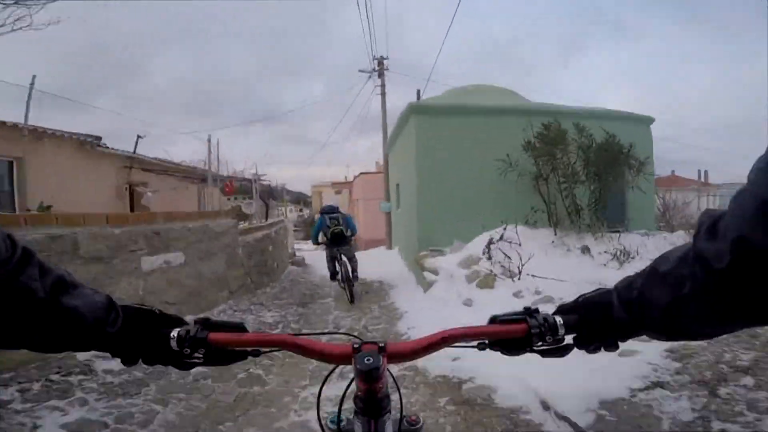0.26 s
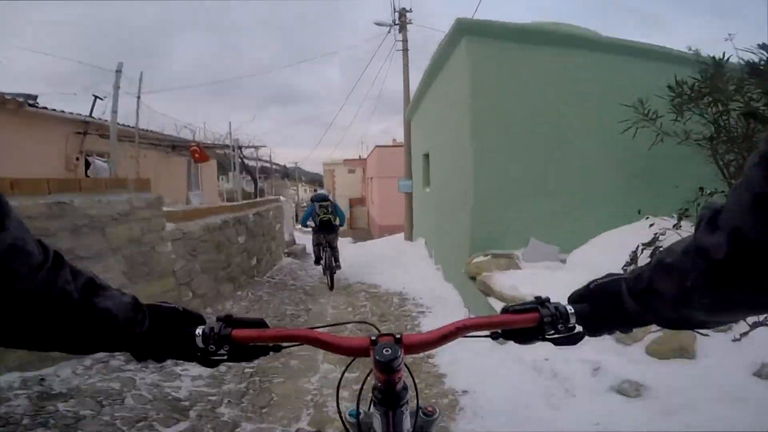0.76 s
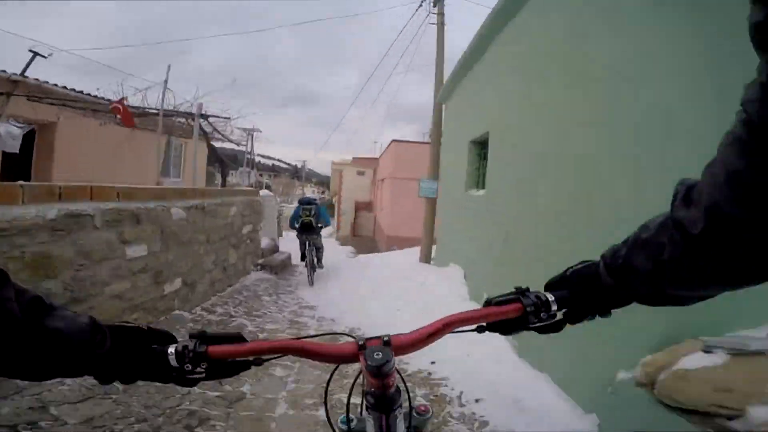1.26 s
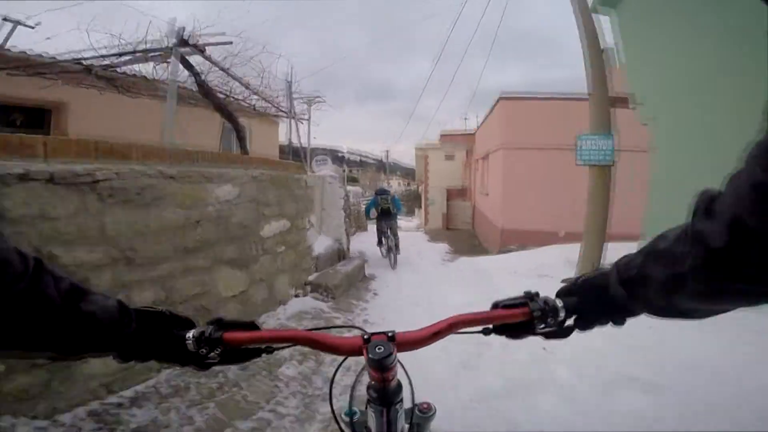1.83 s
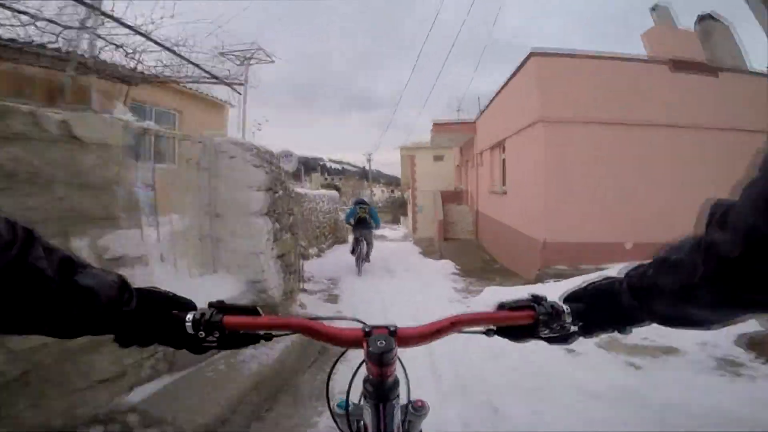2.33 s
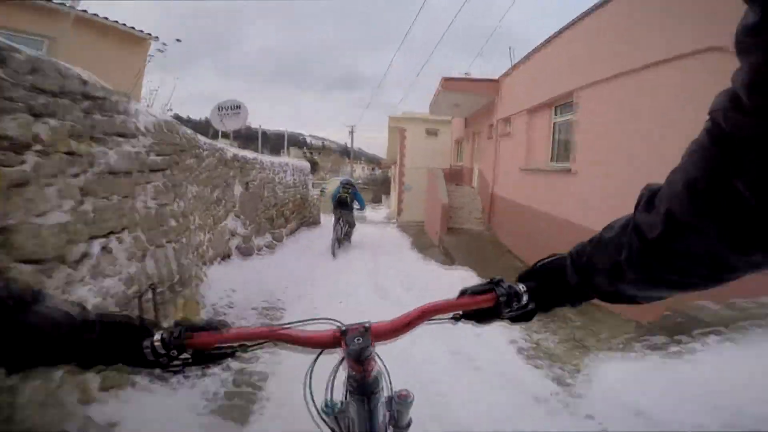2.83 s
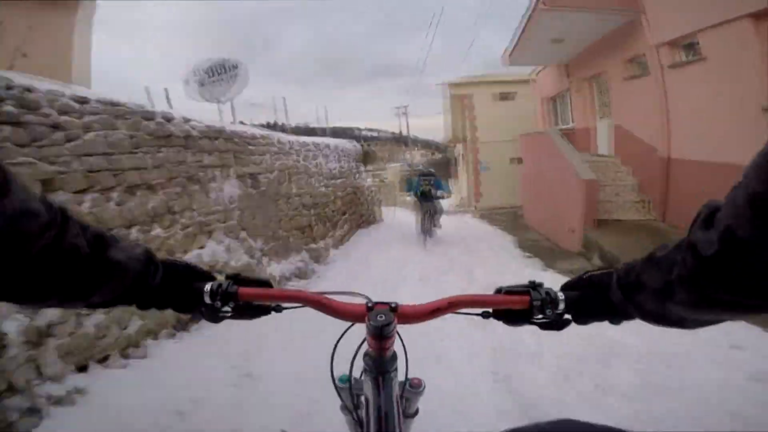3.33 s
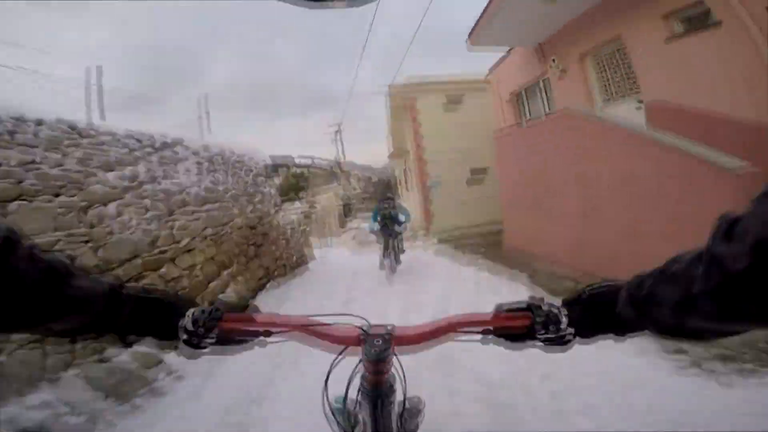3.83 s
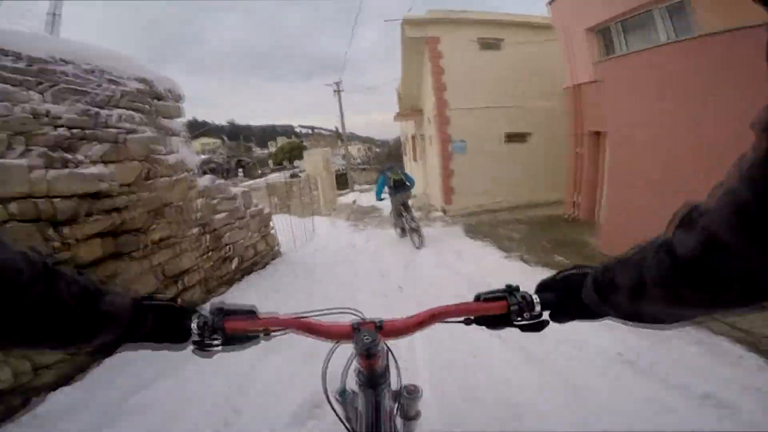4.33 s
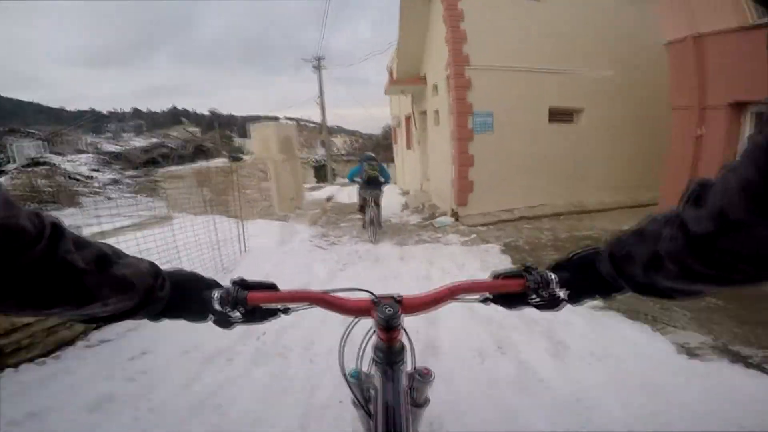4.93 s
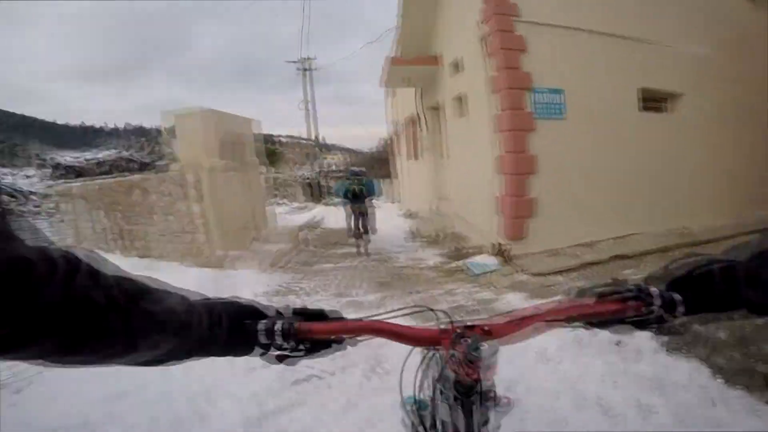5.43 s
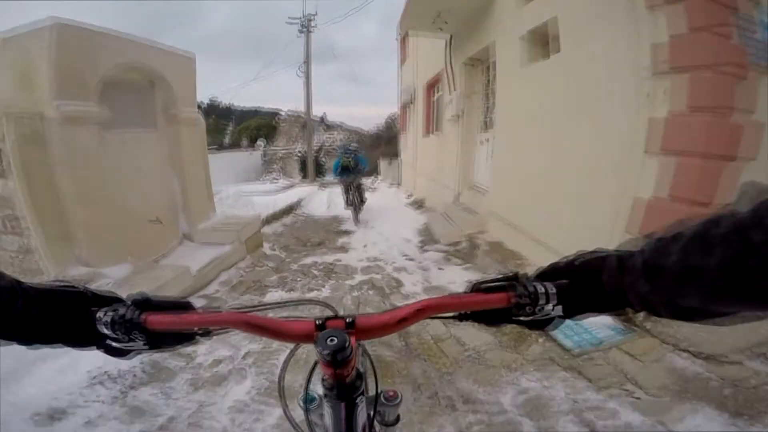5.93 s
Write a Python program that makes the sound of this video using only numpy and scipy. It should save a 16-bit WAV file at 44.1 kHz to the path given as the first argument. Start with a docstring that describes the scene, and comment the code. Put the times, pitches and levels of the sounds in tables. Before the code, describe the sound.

Close up, a hard plastic case clacks irregularly, several times a second, over constant fine rattling and crunching ice. Below, deep pressure swings and a droning road shake the bass. A sharp pair of clacks comes soon after one second; dull knocks and thumps gather later, and the two hardest cracks land near the end. Outdoors, dry, muffled inside a chest-mounted case.

```python
"""Hard plastic clacks and close chatter come first, over a shaking bass: a sealed case with a camera's
microphone inside rides on a cyclist's chest down icy cobbles. Rough contacts ring the shell's modes,
slides grate up to a snap, knocks ring the hollow mount and jolts thump through the harness.
Dense tiny contacts, ice crunch and a faint air hiss make the chatter; below lie slow pressure swings,
buffets and the drone of the road, all shaped from noise."""
import sys
import numpy as np
from scipy import signal
from scipy.fft import rfft, irfft, next_fast_len
from scipy.io import wavfile
from scipy.ndimage import uniform_filter1d, map_coordinates

SR = 44100
rng = np.random.default_rng(int(sys.argv[2]) if len(sys.argv) > 2 else 0)


def int16_out(signal):
    """Quantize to a 16-bit WAV file."""
    q = np.round(np.clip(np.atleast_2d(signal).T, -1, 1) * 32767)
    wavfile.write(sys.argv[1], SR, q.astype(np.int16))


N = 272083

# modes of the hollow mount: mode_hz [Hz], level_db [dB], t60_s [s]
HOLLOW_MODES = [(460, -1.5, 0.014), (645, -2.5, 0.02), (1015, 0, 0.019), (1114, -0.5, 0.016),
                (1318, -0.5, 0.02)]
# modes of the plastic shell, lowest first: mode_hz [Hz], level_db [dB], t60_s [s]
SHELL_MODES = [(1818, 1, 0.0095), (2044, 1.5, 0.006), (2340, -8.5, 0.016), (2680, 1, 0.01),
               (3035, 1, 0.0076), (3440, 2.5, 0.009), (3863, -7, 0.012), (4190, 0.5, 0.0083),
               (4760, -12, 0.0094), (5206, -12, 0.008), (5920, -10, 0.0065), (6530, -12, 0.0067)]
# colour of the air hiss and the ice flicks: freq_hz [Hz], relative level_db [dB]
HISS_COLOUR = [(3000, -120), (5500, 0), (7000, -6), (8200, -1.5), (9000, 3), (9700, -2), (10500, 0),
               (12000, -17.5), (13000, -2), (15100, -25), (15500, -17), (17000, -120)]


def clacks():
    """Each contact rings the shell and the hollow modes and leaves a bright snap."""
    # clacks and scrapes of the case: start_s [s], peak_db [dB], hollow_db [dB against the peak],
    # rub_t60_s [s, limited in scraped and snap], favoured_hz [Hz], treble_db [dB lift]
    contacts = [(0.0722, -33, -19, 0.036, 2510, -2), (.126, -25.5, -12.5, 0.017, 2590, 3),
                (.212, -22.5, -14, 0.042, 2580, 3.5), (0.3271, -24.5, -13.5, 0.028, 2100, 2),
                (0.371, -27.5, -33, 0.038, 3030, -6), (0.4333, -23.5, -9.5, 0.027, 2680, -2),
                (0.499, -20.5, -17, 0.015, 2680, 2.5), (0.623, -24, -13, 0.018, 2620, 4.5),
                (0.761, -31.5, -4.5, 0.13, 2680, 9.5), (.861, -35, -31, 0.024, 3440, 2),
                (0.894, -32.5, -23, 0.038, 3440, 11), (0.932, -27.5, -37, 0.0089, 3430, 0),
                (0.9568, -30.5, -32, 0.089, 4170, -10), (.972, -28, -32, 0.15, 3440, 14),
                (1.001, -33, -16, 0.014, 3440, 14), (1.086, -38, -27, 0.023, 4190, 15),
                (1.1, -33, -16, 0.012, 2680, 8), (1.198, -30, -15, 0.074, 4170, 3),
                (1.3086, -16, -26.5, 0.0021, 2730, 3), (1.401, -12.5, -21, 0.011, 2670, 1),
                (1.487, -38, -30, .06, 3970, -4), (1.549, -26, -3.5, .024, 2680, -1),
                (1.63, -23.5, -13, 0.053, 2520, 2), (1.726, -28.5, -12, 0.17, 4200, 5),
                (1.871, -22, -14, .023, 2600, 5), (1.951, -29, -27, 0.13, 3370, 2),
                (2.0648, -20.5, -14, 0.0026, 3460, 12.5), (2.11, -32, -19, 0.1, 2340, 11),
                (2.133, -29.5, -22, 0.011, 3440, 8), (2.152, -29, -34, 0.063, 3220, 8),
                (2.226, -19.5, -15, 0.032, 2830, 8), (2.264, -27, -20, 0.053, 3250, -11),
                (2.289, -30, -22, 0.078, 3440, 10), (2.31, -31, -21, 0.075, 3440, 0),
                (2.371, -27, -10, 0.021, 2600, 3), (2.5123, -23, -11, 0.05, 2740, 2.5),
                (2.6583, -24.5, -15, 0.0017, 2670, -7), (2.7085, -25.5, -36, 0.043, 3500, -16),
                (2.734, -31, -20, 0.025, 3600, 8), (2.798, -18, -14.5, 0.033, 2570, 6),
                (2.943, -22, -35, 0.0064, 1780, 4.5), (3.0081, -30, -18, 0.019, 2330, 2),
                (3.111, -33.5, -14, 0.029, 3450, 8), (3.1907, -31, -11, 0.011, 2680, 0),
                (3.33, -24.5, -16, 0.0077, 3440, 13), (3.438, -37, -16, 0.016, 3440, 12),
                (3.554, -29.5, -12, 0.0037, 2840, -1), (3.571, -32, -9, 0.13, 3035, -3),
                (3.597, -27.5, -17, 0.022, 2880, 3), (3.629, -23, -14, 0.016, 2680, -0.5),
                (3.677, -31.5, -27, 0.0089, 3440, 5), (3.7387, -30, -25, .02, 3500, 14),
                (3.757, -30, -7, 0.1, 2680, 4), (3.8206, -30, -19, 0.14, 3400, 10.5),
                (3.905, -28, -8.5, 0.012, 2680, 5), (3.9825, -23.5, -23, 0.055, 4080, 6),
                (4.069, -26, -12.5, 0.065, 1740, 2), (4.144, -33.5, -2, .015, 3440, 4),
                (4.176, -24.5, -13, 0.22, 3830, 7), (4.218, -20, -10, 0.011, 2460, 9),
                (4.4326, -29, -20, 0.094, 3440, 7), (4.451, -31.5, -10, 0.062, 2680, -3),
                (4.4651, -18.5, -18, 0.0037, 2044, 11.5), (4.5636, -26, 4, 0.041, 3210, 3.5),
                (4.6984, -30.5, -35, 0.22, 3650, 4), (4.761, -30.5, -24, 0.0049, 2680, 10),
                (4.8221, -30, -23, 0.0075, 4060, 6), (4.9517, -29.5, -7, 0.036, 2530, 1),
                (4.965, -29, -15, 0.038, 2680, 7), (5.081, -25, -12.5, 0.0024, 2850, 5),
                (5.189, -27.5, -1.5, 0.081, 2580, 6), (5.348, -30, -33, 0.0039, 2840, 3),
                (5.386, -29, -11, 0.19, 2740, 5), (5.4287, -26.5, -13, 0.021, 2680, 7.5),
                (5.537, -18.5, -13.5, 0.047, 2660, 6), (5.675, -9.5, -41, 0.0061, 3300, 9),
                (5.721, -32, -20, .1, 2670, 0), (5.857, -29.5, -14, 0.022, 3060, 3),
                (5.871, -29, -21, 0.1, 3060, -4), (5.9666, -23.5, -8, .11, 2500, -10),
                (5.998, -26.5, -29, 0.056, 3440, 4), (6.0403, -23.5, -10, 0.13, 4080, -1),
                (6.1, -22.5, -20, 0.055, 2860, 5), (6.1234, -8.5, -35, 0.0094, 3030, 9.5),
                (6.145, -28, -34, 0.05, 3420, 0)]
    treble_from_hz = 4400
    out = np.zeros(N)
    for start_s, peak_db, hollow_db, rub_s, favoured_hz, treble_db in contacts + faint_clacks(count=20):
        modes = [(hz, db + treble_db * (hz > treble_from_hz), t60) for hz, db, t60 in SHELL_MODES]
        modes = favoured(modes, favoured_hz, lift_db=9.5, width=0.069)
        shell = ring(modes, spread_db=0.5, attack_s=0.00071)
        add(out, start_s, amp(peak_db) * scraped(shell, rub_s, blow=0.91))
        hollow = ring(HOLLOW_MODES, spread_db=1.0, attack_s=0.00036)
        add(out, start_s, amp(peak_db + hollow_db) * scraped(hollow, rub_s, blow=1.64))
        # the snap rises 0.89 dB for each dB of the blow
        snap_db = 0.89 * peak_db - 21 + 0.68 * treble_db
        add(out, start_s, amp(snap_db) * snap(rub_s))
    return out


def faint_clacks(count):
    """Rows for faint clacks: any moment, favouring any of the eight lowest shell modes."""
    when, size, which = rng.random((count, 3)).T
    start_s = when * N / SR
    peak_db = -38 + 4 * (2 * size - 1)
    favoured_hz = np.array(SHELL_MODES)[(which * 8).astype(int), 0]
    return [(s, db, -18, 0.012, hz, 4) for s, db, hz in zip(start_s, peak_db, favoured_hz)]


def snap(rub_s):
    """The bright edge of a contact: rubbing that rings a treble band; peak 1."""
    band = signal.butter(4, [6000, 14800], "bandpass", fs=SR, output="sos")
    bright = signal.sosfilt(band, signal.unit_impulse(64))
    return scraped(bright, min(rub_s, 0.015), blow=0.1)


def slides():
    """The case slides and grates ever louder on its ringing shell, up to the snap of a blow."""
    # slides ending in a blow: blow_s [s], grating_peak_db [dB], slide_s [s], snap_db [dB peak]
    slide_rows = [(1.401, -17, 0.01, -22.5), (1.629, -35, 0.018, -47), (4.468, -14, 0.0042, -23.5),
                  (5.668, -26, 0.011, -49), (6.119, -26, 0.027, -40)]
    out = np.zeros(N)
    for blow_s, peak_db, slide_s, snap_db in slide_rows:
        grow = np.linspace(0, 1, round(slide_s * SR)) ** 1.8
        friction = grow * rng.standard_normal(len(grow))
        grate = signal.fftconvolve(ring(SHELL_MODES[:8], spread_db=2, attack_s=0.0002), friction)
        add(out, blow_s - slide_s, amp(peak_db) * grate / np.abs(grate).max())
        add(out, blow_s - 0.001, amp(snap_db) * snap(rub_s=0.002))
    return out


def knocks():
    """Duller blows ring the hollow modes and the four lowest shell modes, with a dull broad rattle."""
    # hollow knocks of the mount: start_s [s], peak_db [dB], shell_db [dB against the peak], favoured_hz [Hz]
    knock_rows = [(0.984, -36, -2, 645), (1.737, -27.5, 0.5, 1050), (2.064, -33, -29, 460),
                  (3.075, -35, -4, 1015), (3.505, -36.5, -7, 460), (3.839, -32.5, -3.5, 1015),
                  (4.155, -34, 2, 1015), (4.25, -35, -2, 1015), (4.477, -34.5, -18, 1050),
                  (4.7, -29, -22, 1015), (4.75, -35.5, -2.5, 1040), (4.799, -36.5, 0.5, 1015),
                  (5.606, -29, -7, 645), (5.665, -17.5, -5, 1080), (5.829, -27.5, -8, 1060),
                  (5.975, -26.5, -6, 1040), (6.123, -27.5, -16, 1318)]
    band = signal.butter(2, [900, 2600], "bandpass", fs=SR, output="sos")
    dull = signal.sosfilt(band, signal.unit_impulse(256))
    out = np.zeros(N)
    for start_s, peak_db, shell_db, favoured_hz in knock_rows:
        modes = favoured(HOLLOW_MODES, favoured_hz, lift_db=8.5, width=0.12)
        hollow = ring(modes, spread_db=1.5, attack_s=0.0001)
        add(out, start_s, amp(peak_db) * scraped(hollow, 0.026, blow=0.5))
        add(out, start_s, amp(peak_db - 6) * scraped(dull, 0.03, blow=1.0))
        low_shell = ring(SHELL_MODES[:4], spread_db=2, attack_s=0.0004)
        add(out, start_s, amp(peak_db + shell_db) * scraped(low_shell, 0.079, blow=0.063))
    return out


def thumps():
    """A jolt through the harness: a couple of heavily damped cycles whose pitch sags."""
    # jolts: start_s [s], peak_db [dB ahead of the body's low-pass], pitch_hz [Hz the sag settles to]
    jolts = [(0.905, -36, 111), (1.218, -32.5, 112), (1.676, -35, 139), (1.552, -41, 145),
             (1.746, -20, 150), (1.797, -35, 141), (2.06, -29, 99), (3.079, -35, 160), (3.139, -42, 115),
             (3.329, -38, 145), (3.501, -39, 142), (3.84, -34, 146), (3.959, -36, 160), (3.995, -34, 138),
             (4.156, -30.5, 134), (4.245, -32, 140), (4.525, -36, 146), (4.562, -29.5, 121),
             (4.61, -33, 128), (4.699, -32.5, 154), (4.745, -39, 101), (4.796, -30.5, 115),
             (5.188, -39.5, 164), (5.598, -36, 155), (5.6684, -11.5, 123), (5.725, -22.5, 127),
             (5.981, -28, 116)]
    out, t = np.zeros(N), np.arange(SR // 8) / SR
    for start_s, peak_db, pitch_hz in jolts:
        turns = pitch_hz * (t + 0.0023 * (1 - np.exp(-t / 0.012)))
        decay = amp(-60 * t * pitch_hz / 3.3)  # 60 dB in 3.3 cycles
        push = -np.sin(2 * np.pi * turns) * decay * (1 - np.exp(-t / 0.0034))
        add(out, start_s, amp(peak_db) * push / np.abs(push).max())
    return filtered(out, lambda hz: 1 / (1 + (hz / 290) ** 6))  # the body passes only the bass


def chatter(level_db):
    """Dense tiny contacts in clumps ring the shell over the crunch of ice; a faint air hiss lies on top."""
    # colour of the ice crunch: freq_hz [Hz], relative level_db [dB]
    crunch_colour = [(500, -28), (1300, -6), (1800, 5), (2300, 1), (3450, 5.5), (3750, -2), (4300, -0.5),
                     (4900, -8), (5700, -20), (7500, -22), (12000, -40), (16000, -120)]
    contact_rate = 1200  # per second
    clump = amp(3.6 * wobble(60) + 1.1 * wobble(14))  # quick and slow unevenness

    sizes = amp(4.2 * np.minimum(rng.exponential(size=N), 4.5)) * rng.choice([-1, 1], N)
    ticks = (rng.random(N) < contact_rate / SR) * sizes
    rattle = patchy(filtered(ticks * clump, case_resonance), depth_db=4.5)

    bites = (rng.random(N) < contact_rate / SR) * amp(5 + 6 * rng.random(N))
    grit = rng.standard_normal(N) * (0.7 + bites)
    crunch = patchy(coloured(grit, crunch_colour) * clump ** 0.34, depth_db=3)

    taps = unit(light_taps(count=1800) * clump ** 1.85)
    air = patchy(noise(HISS_COLOUR) * clump ** 0.12, depth_db=3.2)
    hiss = air + amp(-0.5) * ice_flicks(rate=55)

    contacts = amp(-4.0) * rattle + amp(-1.5) * crunch + amp(-8) * taps
    return amp(level_db) * contacts + amp(0.41 * level_db - 48.0) * hiss


def case_resonance(hz):
    """Response of the hollow and shell modes as damped resonances of alternating sign."""
    total = 0
    for k, (mode_hz, db, t60) in enumerate(HOLLOW_MODES + SHELL_MODES):
        resonance = 1j * hz * (3.5 / t60) / (mode_hz ** 2 - hz ** 2 + 1j * hz * 2.2 / t60)
        total = total + (-1) ** k * amp(db) * resonance
    return total


def light_taps(count):
    """Loose parts tap so lightly that one shell mode alone sounds for a few milliseconds; rms 1."""
    when, which, size, life = rng.random((count, 4)).T[:, :, None]
    mode = (which ** 0.6 * 8).astype(int)
    hz = np.array(SHELL_MODES)[mode, 0] * (1 + 0.039 * (life - 0.5))
    t = np.arange(SR // 80) / SR
    envelope = amp(-60 * t / (0.0033 + 0.01 * life)) * (1 - np.exp(-t / 0.002))
    taps = (1.01 - size) ** -0.3 * np.sin(2 * np.pi * hz * t) * envelope
    at = (when * N).astype(int) + np.arange(len(t))
    return unit(np.bincount(at.ravel(), taps.ravel(), N + len(t))[:N])


def ice_flicks(rate):
    """Sparse bits of ice flick the shell, rate a second: brief decaying treble bursts; rms 1."""
    flicks = (rng.random(N) < rate / SR) * amp(14 * rng.random(N))
    burst = signal.lfilter([1], [1, -np.exp(-1 / (0.0043 * SR))], flicks)
    return coloured(burst * rng.standard_normal(N), HISS_COLOUR)


def rumble(road_db):
    """Slow pressure swings, quicker buffets above them, and the road droning through the rider."""
    # slow swings between the bumps: time_s [s], level_db [dB ahead of smoothing]
    shake_curve = [(0, -28), (.6, -27.5), (1.0, -25), (1.5, -29), (2.03, -28), (2.5, -26.5), (3.0, -30),
                   (3.6, -28), (4.2, -25.5), (4.45, -32.5), (4.8, -28), (5.4, -30.5), (5.76, -30.5),
                   (6.17, -37)]
    # colours of the swings, buffets and road: freq_hz [Hz], relative level_db [dB]
    swing_colour = [(4, -5), (9, -1), (20, 5), (32, 1), (45, -14), (60, -48), (90, -36), (150, -120)]
    buffet_colour = [(30, -120), (46, 5), (62, 2), (90, -9.5), (140, -26.5), (220, -30), (330, -120)]
    road_colour = [(60, -120), (110, 2), (200, -4), (320, -11), (900, -17.5), (1600, -24), (3000, -120)]

    swing_gain = np.maximum(amp(curves(shake_curve)[0]), bump_swells(column=1, width_s=0.032))
    swing = swing_gain * even(noise(swing_colour), floor=0.56)
    swing = filtered(swing, lambda hz: 1 / (1 + (hz / 80) ** 4.6))  # smooth, without corners

    buffet_gain = amp(-48 - 3 * wobble(4.9)) + bump_swells(column=2, width_s=0.024)
    buffet = buffet_gain * even(noise(buffet_colour), floor=0.071)

    road, flutter = noise(road_colour), amp(4.5 * wobble(20))
    low = filtered(road, lambda hz: 1 / (1 + (hz / 230) ** 4))
    # the drone flutters more in its low part
    drone = low * unit(flutter) + (road - low) * unit(flutter ** 0.56)
    return swing + buffet + amp(road_db) * drone


def bump_swells(column, width_s):
    """Each bump under the wheels gives one smooth swell of gain in the bass."""
    # bumps: middle_s [s], heave_db [dB gain of the swings], buffet_db [dB gain of the buffets]
    bumps = [(0.338, -20.5, -33), (.46, -20.5, -67), (.64, -21, -45), (.7, -21, -36.5), (0.802, -16.5, -63),
             (1.04, -21.5, -29.5), (1.211, -18, -59), (1.388, -17.5, -28), (1.634, -17, -42),
             (1.751, -23, -28.5), (1.889, -16, -37), (2.089, -17, -38), (2.439, -30, -38),
             (2.78, -19.5, -35.5), (3.15, -24, -41), (3.209, -19, -53), (3.437, -16, -44),
             (3.58, -20.5, -41), (3.718, -20.5, -55), (3.791, -22, -45), (3.92, -22, -33.5),
             (4.08, -22.5, -38), (4.319, -20, -51), (4.584, -22, -33), (4.71, -24, -50), (5.269, -33, -32),
             (5.44, -22.5, -60), (5.682, -18.5, -28.5), (5.839, -16.5, -54), (5.984, -24, -37.5),
             (6.14, -22.5, -50)]
    t = np.arange(N) / SR
    return sum(amp(row[column]) * np.exp(-((t - row[0]) / width_s) ** 2) for row in bumps)


def scraped(x, t60, blow):
    """A first blow, then rough rubbing that swells briefly and dies away, each bit ringing like x; peak 1."""
    t = np.arange(SR // 16) / SR
    grip = 2.6  # the hardest slip, in spreads of the random force before cubing
    slips = np.clip(rng.standard_normal(len(t)), -grip, grip) ** 3
    fade = amp(-60 * t / np.clip(t60, 0.002, 0.15))
    force = slips * fade * (1 - np.exp(-t / 0.00016))
    y = signal.fftconvolve(x, force / np.linalg.norm(force) + blow * (t == 0))
    return y / np.abs(y).max()


def ring(modes, spread_db, attack_s):
    """One blow: every mode decays from a new random strength and phase; peak 1."""
    t = np.arange(SR // 16) / SR
    hz, db, t60 = np.transpose(modes)[:, :, None]
    strength, phase = rng.standard_normal((2, len(modes), 1))
    decay = amp(db + spread_db * strength - 60 * t / t60)
    x = np.sum(decay * np.sin(2 * np.pi * hz * t + 2 * phase), axis=0)
    x *= 1 - np.exp(-t / max(attack_s, 1e-5))
    return x / np.abs(x).max()


def favoured(modes, centre_hz, lift_db, width):
    """Where the case is struck decides which modes ring most; width is in log frequency."""
    return [(hz, db + lift_db * np.exp(-(np.log(hz / centre_hz) / width) ** 2), t60)
            for hz, db, t60 in modes]


def patchy(x, depth_db):
    """x with random patches of gain, some 860 Hz by 15 ms; rms 1."""
    z = signal.stft(x, nperseg=256)[2]
    field = uniform_filter1d(rng.standard_normal(z.shape), 5, 0)
    field = uniform_filter1d(field, 5, 1)
    return unit(signal.istft(z * amp(depth_db * unit(field)), nperseg=256)[1][:N])


def even(x, floor):
    """Swings of nearly even size; a level curve then sets how hard they push."""
    envelope = np.abs(signal.hilbert(x, next_fast_len(N))[:N])
    return unit(x / (envelope + floor))


def noise(spectrum):
    """White noise through a spectrum, rms 1."""
    return coloured(rng.standard_normal(N), spectrum)


def coloured(x, spectrum):
    """x through a (Hz, dB) spectrum, rms 1."""
    f, db = np.transpose(spectrum)
    return unit(filtered(x, lambda hz: amp(np.interp(np.log(hz + 1), np.log(f + 1), db))))


def filtered(x, response):
    """x times a response of frequency."""
    m = next_fast_len(N + 8192)
    return irfft(rfft(x, m) * response(np.fft.rfftfreq(m, 1 / SR)), m)[..., :N]


def wobble(rate):
    """A smooth random curve, rate knots a second."""
    knots = rng.standard_normal(int(N * rate / SR) + 4)
    return map_coordinates(knots, [np.arange(N) * rate / SR])


def curves(rows):
    """One value per sample for each column after the time."""
    s, *cols = np.transpose(rows)
    return [np.interp(np.arange(N) / SR, s, c) for c in cols]


def add(track, s, x):
    """Mixes x into the track at s seconds."""
    part = track[round(s * SR):][:len(x)]
    part += x[:len(part)]


def amp(db):
    """Decibels to a gain."""
    return 10 ** (np.asarray(db) / 20)


def unit(x):
    """x at rms 1."""
    return x / np.sqrt(np.mean(x ** 2) + 1e-20)


def scene():
    """The case close to the microphone, over its chatter and the rumble of the ride."""
    # course of the ride: time_s [s], chatter_db [dB drive of the chatter], road_db [dB drive of the drone]
    ride = [(0.0, -53, -61), (0.38, -48.5, -60.5), (0.63, -50.5, -54.5), (1.87, -48, -52.5),
            (2.22, -50.5, -55.5), (2.54, -53, -56), (3.02, -49.5, -53.5), (3.18, -50, -55),
            (4.09, -48, -50), (4.36, -47.5, -49.5), (4.71, -51.5, -51), (4.86, -51, -52),
            (5.26, -49.5, -54.5), (5.6, -46, -47), (5.79, -48.5, -48), (6.17, -44.5, -52.5)]
    chatter_db, road_db = curves(ride)
    case = clacks() + knocks() + slides() + thumps()
    return (case + chatter(chatter_db) + rumble(road_db))[None]


def record(dry):
    """The camera keeps nothing above its band limit."""
    return filtered(dry, lambda hz: hz < 16450)


dry = scene()
out = record(dry)
int16_out(out)
```